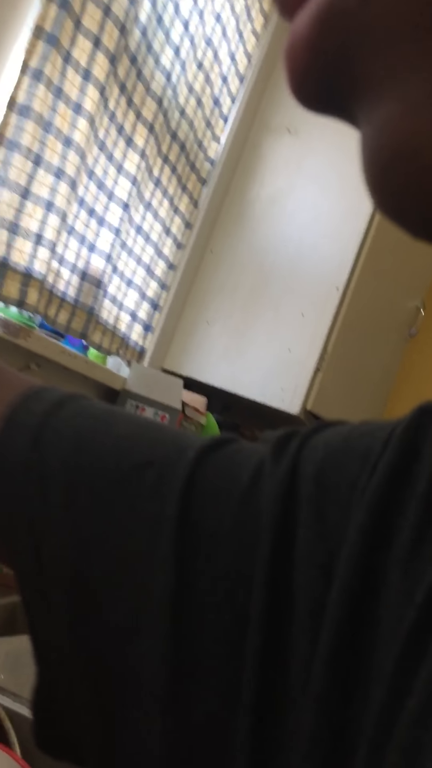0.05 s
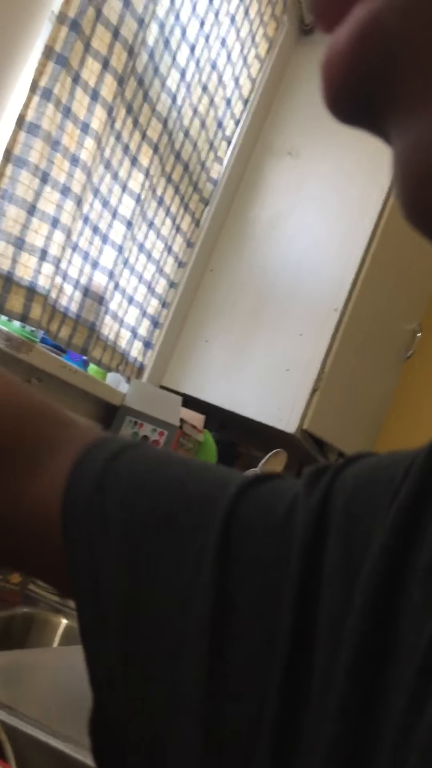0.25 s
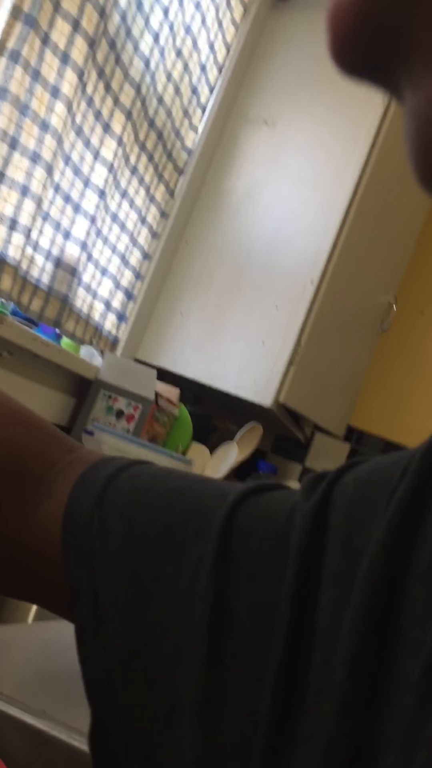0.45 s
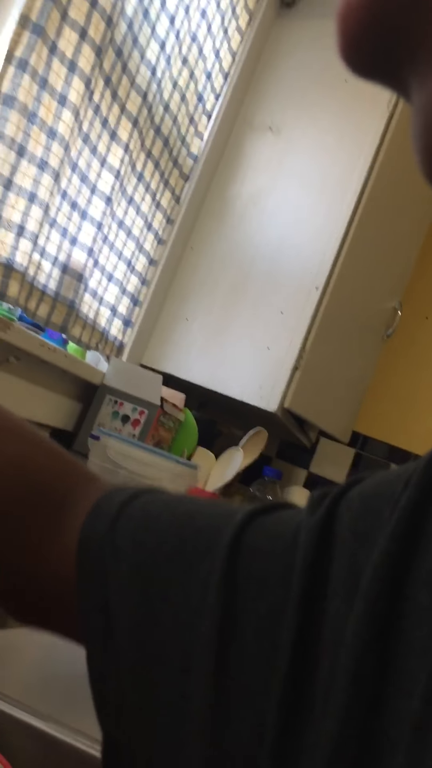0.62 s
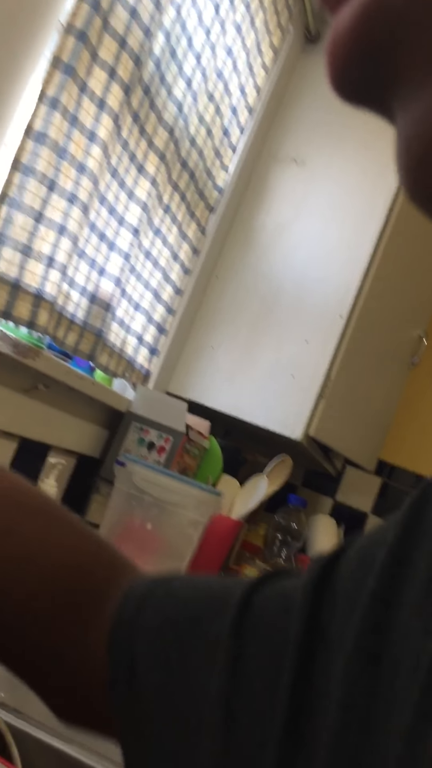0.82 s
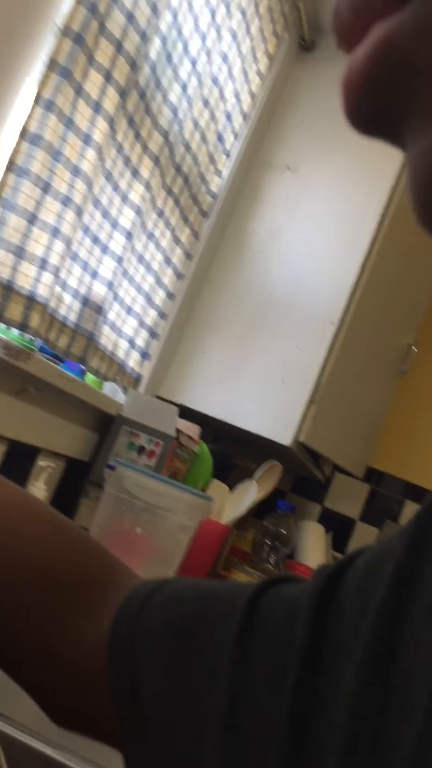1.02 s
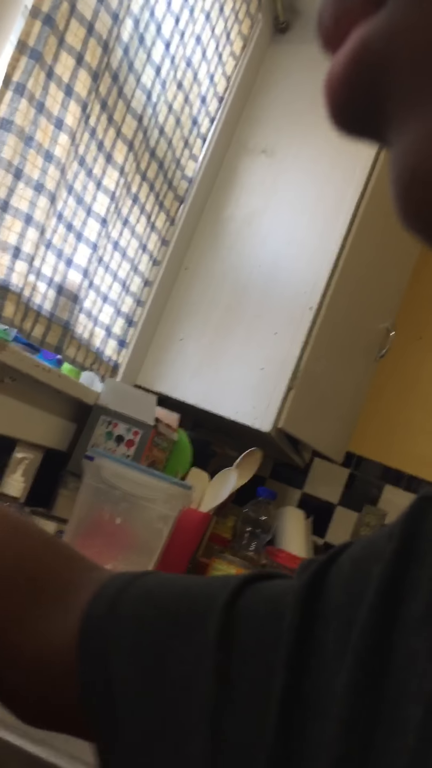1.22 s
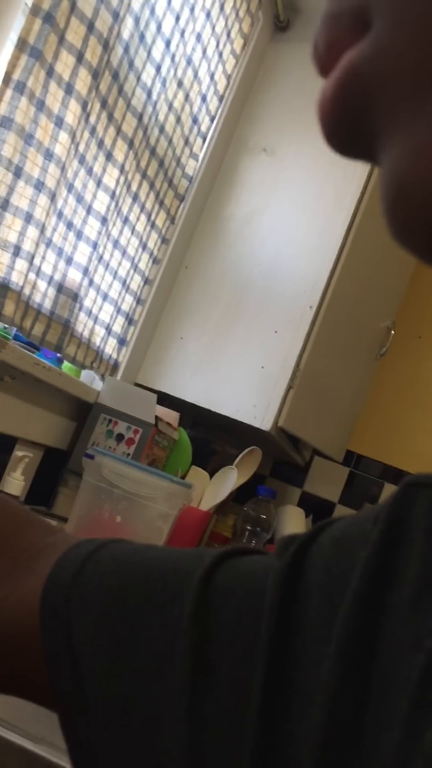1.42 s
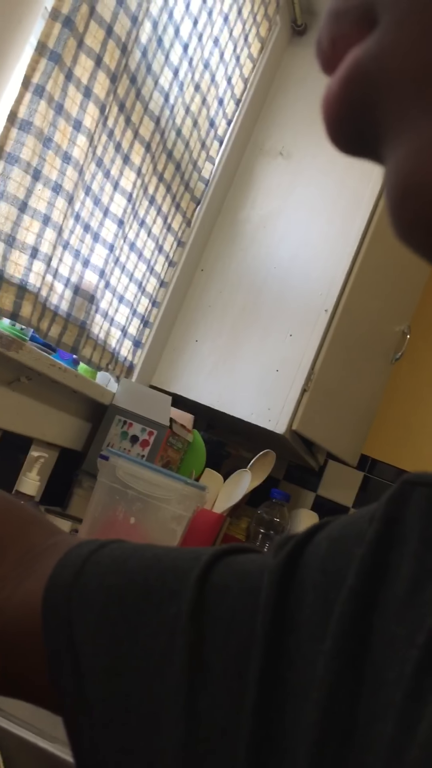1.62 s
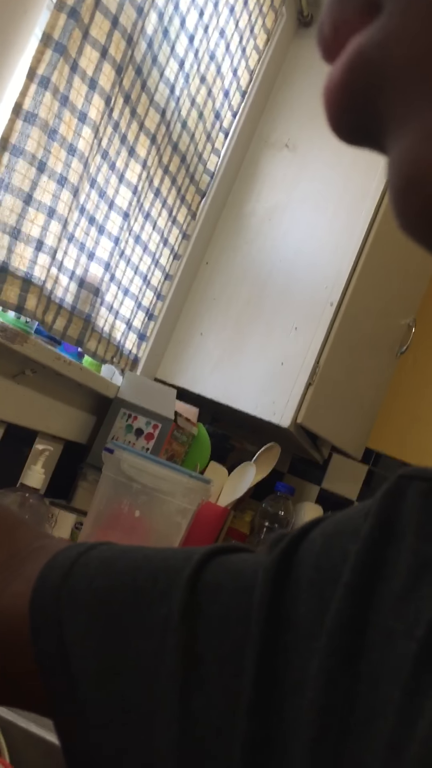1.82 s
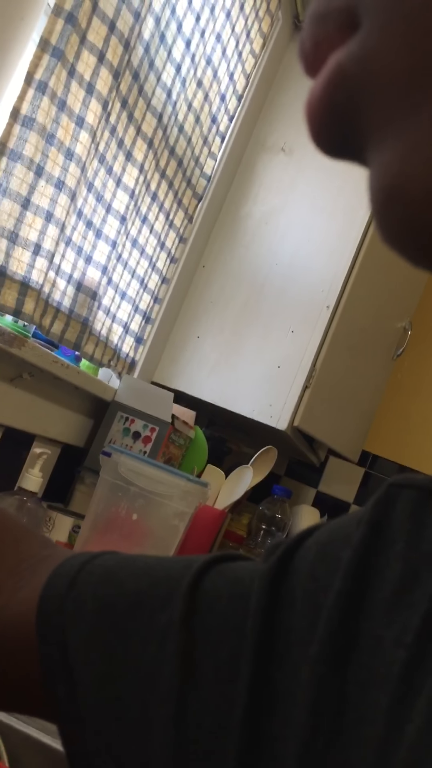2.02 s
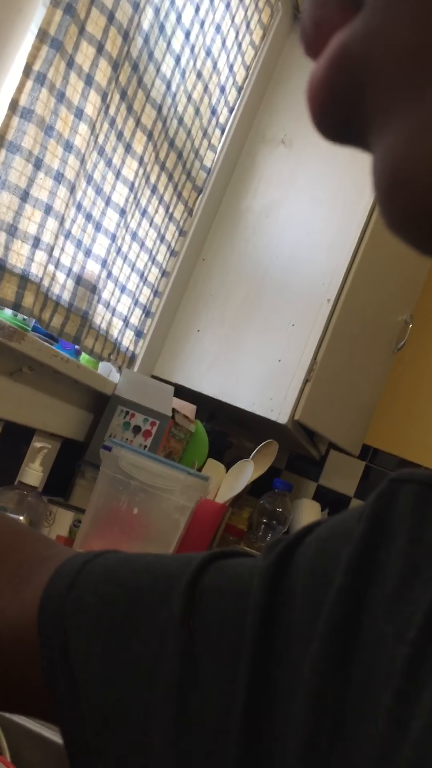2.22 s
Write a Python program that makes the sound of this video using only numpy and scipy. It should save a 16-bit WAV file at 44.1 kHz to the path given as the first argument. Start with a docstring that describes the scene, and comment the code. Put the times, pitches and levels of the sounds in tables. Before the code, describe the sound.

Cutlery clatter in a kitchen sink: one bright crash, a quieter gap, then scattered clanks

```python
"""Small kitchen, steel sink, washing up. Cutlery crashes onto a dish and rattles: modes over fading noise.
Things are knocked (damped noise and thin rings), clinked and scraped (grainy resonant noise).
Some blows boom the basin (decaying hum), the sink unit thumps, and water gulps (clusters of bubbles).
Hard walls answer with a diffuse tail, over room tone, uneven rumble and a late hiss of water."""
import sys
import numpy as np
from scipy import signal
from scipy.fft import rfft, irfft, next_fast_len
from scipy.io import wavfile
from scipy.ndimage import map_coordinates

SR = 44100
rng = np.random.default_rng(int(sys.argv[2]) if len(sys.argv) > 2 else 0)


def store_pcm(level_fs):
    """Save levels as 16-bit WAV."""
    pcm = np.round(np.clip(level_fs, -1, 1) * 32767).astype(np.int16)
    wavfile.write(sys.argv[1], SR, np.atleast_2d(pcm).T)


N = 101430
METAL_BLUR = .0015  # line width over pitch, as the pieces jostle


def amp(db):
    """Decibels to gain."""
    return 10 ** (np.asarray(db) / 20)


def unit(x):
    """Scaled to rms 1."""
    return x / np.sqrt(np.mean(x ** 2) + 1e-20)


def along(points, hz):
    """(Hz, value) points read on a log frequency axis."""
    point_hz, value = np.transpose(points)
    return np.interp(np.log(hz + 1), np.log(point_hz + 1), value)


def seconds(size=16384):
    """Time axis; the default size is that of one ring."""
    return np.arange(size) / SR


def curve(rows):
    """(s, value) points, one value per sample."""
    return np.interp(seconds(size=N), *np.transpose(rows))


def add(track, start_s, sound):
    """Mixes a sound into the track at start_s, cut at the track's end."""
    start = max(0, round(start_s * SR))
    track[start:start + len(sound)] += sound[:N - start]


def soft(hz, corner_hz):
    """Treble loss of a contact."""
    return 1 / np.sqrt(1 + (hz / corner_hz) ** 6)


def noise(gain, size=16384):
    """Noise whose spectrum follows gain(Hz)."""
    spectrum = rfft(rng.standard_normal(size))
    return irfft(spectrum * gain(np.fft.rfftfreq(size, 1 / SR)), size)


def dying(x, t60):
    """Each frequency of x fades at its own speed."""
    hz, t, bins = signal.stft(x, SR, nperseg=256)
    faded = bins * amp(-60 * t / along(t60, hz)[:, None])
    return signal.istft(faded, SR, nperseg=256)[1][:len(x)]


def ring(hz, gain, t60_s, blur=0):
    """Sum of decaying modes; blur lets each wander in phase."""
    t = seconds()[:, None]
    phase = hz * t + rng.random(len(hz))
    if blur:
        step = np.sqrt(blur * hz / (2 * np.pi * SR))
        phase = phase + np.cumsum(rng.standard_normal(phase.shape), 0) * step
    modes = gain * amp(-60 * t / t60_s) * np.sin(2 * np.pi * phase)
    return modes.sum(1)


def onset(rise_s):
    """Swell of a contact."""
    return 1 - np.exp(-seconds() / max(rise_s, 1e-4))


def crack(db, t60_s=0.011):
    """Extra gain in the first instant of a hard contact."""
    return 1 + amp(db - 60 * seconds() / t60_s)


def rattle(hits_per_s=260, t60_s=.016, hit_db=1):
    """Gain of many tiny rebounds at random moments, each decaying, over a steady 1."""
    hits = rng.random(len(seconds())) < hits_per_s / SR
    rebounds = signal.lfilter([1], [1, -amp(-60 / (t60_s * SR))], hits)
    return unit(1 + amp(hit_db) * rebounds)


def ripple(hz, depth_db=6.5, spacing_hz=90, from_hz=1000):
    """Narrow resonances of a piece of metal, as gain; they fade out toward the bass."""
    peaks = map_coordinates(rng.standard_normal(len(hz)), [hz / spacing_hz])
    depth = 1 - soft(hz, from_hz)
    return unit(amp(depth_db * np.clip(peaks, -2, 2))) ** depth


def crash(rise_s=0.0004):
    """Each landing rings dish and cutlery modes over a clash of resonant, fading noise."""
    # cutlery landings: start_s, dish_db, cutlery_db, clash_db, crack_db (re clash), bright_hz
    landings = [(0.2389, -25.5, -21, -14, 3, 3015), (0.242, -18.5, -28.5, -20.5, -1.5, 3294),
                (0.2497, -23.5, -29.5, -17, -4.5, 3966), (0.2639, -25.5, -32, -22, -5.5, 11000),
                (0.2713, -26, -28, -25, -3.5, 8990), (.289, -36, -37.5, -29, 0, 6000),
                (0.3355, -44.5, -32, -31, 24.5, 8950)]
    # modes of dish and basin together: pitch_hz, level_db
    dish_modes = [(244, 1), (324, -2), (408, -6), (478, -5.5), (521, -4.5), (660, -5.5), (703, -10.5),
                  (970, -3), (1000, -0.5), (1031, -1), (1178, -11), (1352, -9)]
    # modes of the cutlery: pitch_hz, level_db
    cutlery_modes = [(1744, -3), (1876, -2.5), (2597, -4), (2866, -3.5), (3559, -7), (4054, -13),
                     (7160, -6.5), (8440, -11.5)]
    # decay of the dish: freq_hz, t60_s
    dish_t60 = [(240, .27), (660, .33), (1000, .26), (1400, .22)]
    # decay of the cutlery: freq_hz, t60_s
    cutlery_t60 = [(1600, .26), (4000, .24), (9000, .18)]
    # clash spectrum: freq_hz, level_db
    clash_colour = [(30, -37), (80, -23), (170, -11), (260, -4), (480, 2), (700, 5.5), (830, -11),
                    (1200, -8.5), (1900, -2), (3000, -9), (4300, -1), (5000, -13), (6800, -8.5),
                    (10000, -18.5), (15000, -27)]
    # decay of the clash: freq_hz, t60_s
    clash_t60 = [(80, 0.41), (400, 0.29), (2000, 0.26), (5000, 0.17), (13000, 0.25)]
    out = np.zeros(N)
    dish_hz, dish_mode_db = np.transpose(dish_modes)
    steel_hz, steel_mode_db = np.transpose(cutlery_modes)
    for start_s, dish_db, steel_db, clash_db, crack_db, bright_hz in landings:
        body = ring(dish_hz, amp(dish_db + dish_mode_db), along(dish_t60, dish_hz), METAL_BLUR)
        steel_gain = amp(steel_db + steel_mode_db) * soft(steel_hz, bright_hz)
        tines = ring(steel_hz, steel_gain, along(cutlery_t60, steel_hz), METAL_BLUR)

        def clash_gain(hz):
            treble_lift = np.hypot(1, hz * bright_hz / 5500 ** 2)
            return ripple(2 * hz) * amp(along(clash_colour, hz)) * soft(hz, bright_hz) * treble_lift

        burst = dying(unit(noise(clash_gain)), clash_t60)
        clash = amp(clash_db) * crack(crack_db) * rattle() * burst
        add(out, start_s, onset(rise_s) * (body + tines + clash))
    return out


def knocks(lowest_hz=800, highest_hz=13000, count=24):
    """Hand-damped contacts, dull or sharp; each piece leaves its own thin steel ring."""
    # contacts in the sink: start_s, clack_db, body_db and tick_db (re clack), rise_s
    contacts = [(0, -32.5, -1, -22, 0.0041), (0.21, -50.5, 15.5, 16.5, 0.011),
                (0.419, -30, -10, -8.5, 0.0015), (.443, -24, -7, -19.5, 0.0016),
                (.479, -28, -9.5, -23.5, 0.00067), (0.99, -53, 8, -13.5, 0.0016),
                (1.139, -32, -6.5, -13.5, 0.0028), (1.158, -31, -2.5, -13, 0.0017),
                (1.177, -40, -10, -13, 0.0021), (1.252, -40.5, 8.5, -15, 0.0028),
                (1.265, -29.5, -12.5, -16.5, 0.00063), (1.302, -26.5, -2, -21, 0.00058),
                (1.399, -48.5, 4, -22, 0.0022), (1.447, -33, -0.5, -26, 0.0013),
                (1.5011, -53, -3, -35, 0.00061), (1.585, -33, -10, -26.5, 0.003),
                (1.618, -43.5, 8, -23, .002), (1.629, -35, -5, -18, 0.00076),
                (1.643, -35, -7.5, -30, 0.0022), (1.672, -42.5, -9, -32, 0.001),
                (1.699, -56, 3.5, -27, 0.0013), (1.7432, -41.5, 1.5, -24.5, 0.006),
                (1.865, -37, -1, -20, 0.0053), (1.876, -37, -1, -24.5, 0.0015),
                (1.941, -26.5, 0, -13, 0.0055), (1.964, -19, -10, -32, 0.00026),
                (1.988, -28.5, -7.5, -24, 0.0022), (2.027, -29, -7, -6.5, 0.0024),
                (2.138, -50, 5, -6, 0.00184), (2.21, -37, 2, -39, 0.012)]
    # anchors of body, clack and tick: freq_hz
    bands_hz = [480, 2400, 11000]
    # spectrum common to the knocks: freq_hz, level_db
    knock_colour = [(25, -12.5), (65, 11), (190, 7.5), (330, 11.5), (480, 15.5), (680, 14.5), (1000, 6),
                    (1700, 2.5), (3300, 0), (4300, 0.5), (5000, 0.5), (9500, -2.5), (15000, -6)]
    # decay of the knock noise: freq_hz, t60_s
    knock_t60 = [(80, 0.37), (400, 0.14), (2000, 0.096), (6000, 0.098), (13000, 0.1)]
    crack_db, steel_db, steel_t60_s = 7.5, -15, .17
    out = np.zeros(N)
    for start_s, clack_db, body_db, tick_db, rise_s in contacts:
        tone = list(zip(bands_hz, (body_db, 0, tick_db)))

        def colour(hz):
            return amp(along(knock_colour, hz) + along(tone, hz))

        burst = dying(noise(lambda hz: colour(hz) * ripple(hz)), knock_t60)
        # random pitches, denser toward the low end
        place = (np.arange(count) + rng.random(count)) / count
        steel_hz = lowest_hz + (highest_hz - lowest_hz) * place ** 2
        steel_gain = amp(steel_db) * colour(steel_hz) / np.sqrt(count)
        tines = ring(steel_hz, steel_gain, steel_t60_s, METAL_BLUR)
        contact = crack(crack_db) * rattle() * burst
        add(out, start_s, amp(clack_db) * onset(rise_s) * (contact + tines))
    return out


def clinks(t60_s=.17, blur=.008):
    """Short, rough rings of single pieces of cutlery, a few blurred modes each."""
    # pieces left ringing: start_s, level_db, pitch_hz
    pieces = [(1.158, -47, 3000), (1.45, -46, 2650), (1.5005, -55, 3750), (1.63, -51, 3500),
              (1.866, -47, 1700)]
    # modes of a piece: ratio to pitch_hz
    ratios = [.85, 1, 1.09]
    out = np.zeros(N)
    for start_s, level_db, pitch_hz in pieces:
        gain = amp(level_db) / np.sqrt(len(ratios))
        add(out, start_s, ring(pitch_hz * np.array(ratios), gain, t60_s, blur))
    return out


def booms(rise_s=0.00096):
    """The sheet floor of the basin hums on; each heavier blow feeds the same vibration."""
    # blows on the basin floor: start_s, level_db
    blows = [(.992, -48.5), (1.144, -34.5), (1.179, -31), (1.255, -41), (1.302, -26), (1.49, -50),
             (1.752, -47), (1.876, -37.5), (1.943, -36), (1.971, -29.5), (2.039, -36), (2.229, -47)]
    # floor modes, the main hum drops fast, then lingers: pitch_hz, level_db (re blow), t60_s
    floor_modes = [(246, 0, .16), (246, -19, .33), (120, -15, .16), (325, -17, .2), (665, -13, .28)]
    out = np.zeros(N)
    for hz, mode_db, t60_s in floor_modes:
        swing = np.zeros(N)
        for start_s, blow_db in blows:
            decay = amp(blow_db + mode_db - 60 * seconds() / t60_s)
            add(swing, start_s, decay * onset(rise_s))
        out += swing * np.sin(2 * np.pi * (hz * seconds(size=N) + rng.random()))
    return out


def gulps(rise_s=.002):
    """Clusters of large bubbles, each rising in pitch as it dies."""
    # gulps of water: start_s, length_s, level_db
    clusters = [(0.051, 0.088, -55), (0.216, 0.022, -43.5), (0.429, 0.075, -37.5), (0.529, 0.043, -52),
                (.638, 0.0057, -41), (0.65, 0.079, -48), (0.705, 0.034, -42), (0.811, 0.011, -48),
                (0.834, 0.054, -53)]
    median_hz, log_spread, bubbles_per_s = 386, .28, 390
    cycles_to_60db, pitch_rise = 5.6, 0.18  # rise: fraction of pitch gained over the 60 dB decay
    out, t = np.zeros(N), seconds(size=8192)
    for start_s, length_s, level_db in clusters:
        draws = rng.standard_normal((40, 2))[:max(2, int(length_s * bubbles_per_s))]
        cluster = np.zeros(N)
        for k, (pitch, strength) in enumerate(draws):
            hz = median_hz * np.exp(log_spread * np.clip(pitch, -2, 2))
            age = np.minimum(t * hz / cycles_to_60db, 2)
            tone = np.sin(2 * np.pi * hz * t * (1 + pitch_rise * age / 2))
            bubble = tone * amp(-60 * age) * (1 - np.exp(-t / rise_s))
            add(cluster, start_s + length_s * k / len(draws), amp(2 * strength) * bubble)
        # level_db is the rms over the gulp plus a short tail
        out += amp(level_db) * unit(cluster) * np.sqrt((length_s + 0.0059) * SR / N)
    return out


def scrapes(grain_db=2.5, rustle_db=2, ring_db=6):
    """Metal slides on wet metal: grainy, uneven friction through many narrow resonances."""
    # slides: peak_s, half_length_s, level_db, bright_hz
    slides = [(0.246, 0.071, -51, 5340), (0.337, 0.061, -29.5, 4170), (0.576, 0.066, -52, 4160),
              (0.702, 0.11, -64, 4500), (0.859, 0.053, -56, 2980), (1.338, 0.056, -56.5, 6750),
              (1.461, 0.027, -56, 4080), (1.944, 0.099, -52.5, 3420)]
    # friction spectrum: freq_hz, level_db
    scrape_colour = [(200, -14.5), (700, -2), (1900, -1), (3000, -4), (4200, -0.5), (5000, -8.5),
                     (7000, -1.5), (15000, -20)]
    out, t = np.zeros(N), seconds(size=N)
    for peak_s, half_s, level_db, bright_hz in slides:
        peaks, slips, pushes = rng.standard_normal((3, 1000))

        def rub_gain(hz):
            resonance_db = ring_db * map_coordinates(peaks, [hz / 35])
            return soft(hz, bright_hz) * amp(along(scrape_colour, hz) + resonance_db)

        rub = noise(rub_gain, size=N)
        slip_db = grain_db * map_coordinates(slips, [t * 300])
        push_db = rustle_db * map_coordinates(pushes, [t * 70])
        swell = np.exp(-((t - peak_s) / half_s) ** 2)
        out += amp(level_db) * swell * unit(rub * amp(slip_db + push_db))
    return out


def thumps(rise_s=0.0043, centre_hz=75, t60_s=0.18):
    """Dull bumps ring low, loose modes of the sink unit, tuned a little differently each time."""
    # bumps against the sink unit: start_s, level_db
    bumps = [(.005, -43), (0.346, -33), (0.425, -42), (0.725, -39.5), (1.169, -33), (1.945, -31),
             (2.239, -43.5)]
    out = np.zeros(N)
    for start_s, level_db in bumps:
        hz = centre_hz * np.array([.78, 1, 1.3]) * np.exp(rng.normal(0, .08))
        thump = ring(hz, np.array([.5, 1, .5]), t60_s)
        add(out, start_s, amp(level_db) * onset(rise_s) * thump)
    return out


def kitchen(x, build_s=0.028, size=32768):
    """Diffuse answer of the walls: convolution with a noise tail that builds up, then fades."""
    # decay of the room: freq_hz, t60_s
    kitchen_t60 = [(100, 0.55), (2500, 0.41), (7000, 0.37), (14000, 0.49)]
    build = 1 - np.exp(-seconds(size=size) / build_s)
    tail = dying(rng.standard_normal(size), kitchen_t60) * build
    return signal.fftconvolve(x, tail / np.linalg.norm(tail))[:N]


def background(room_tone_db=-66.5, rumble_offset_db=-5):
    """Shaped noises: steady room tone, a low rumble that comes and goes, a late hiss of water."""
    # room tone spectrum: freq_hz, level_db
    room_colour = [(25, -1.5), (150, -2), (600, -4.5), (1300, -9.5), (9000, -18), (16000, -26.5)]
    # rumble level before the offset: time_s, level_db
    rumble_level = [(0, -54.5), (.2, -49.5), (.5, -42.5), (.62, -62), (1.0, -53), (1.09, -77),
                    (1.28, -51.5), (1.55, -48.5), (1.72, -50.5), (2.05, -66), (2.15, -71.5)]
    # rumble spectrum: freq_hz, level_db
    rumble_colour = [(20, -17.5), (45, -7.5), (70, 2), (120, -8), (250, -10.5), (1000, -63)]
    # faint hiss of water: time_s, level_db
    fizz_level = [(1.98, -100), (2.06, -65.5), (2.24, -61.5), (2.29, -71.5)]
    # hiss spectrum: freq_hz, level_db
    fizz_colour = [(500, -24), (3000, -0.5), (7000, 2.5), (10000, -0.5), (15000, 1.5)]

    def bed(colour):
        return unit(noise(lambda hz: amp(along(colour, hz)), size=N))

    room_tone = amp(room_tone_db) * bed(room_colour)
    rumble = amp(rumble_offset_db + curve(rumble_level)) * bed(rumble_colour)
    fizz = amp(curve(fizz_level)) * bed(fizz_colour)
    return room_tone + rumble + fizz


def scene(kitchen_db=-15):
    """Everything in the sink, with the room around it."""
    sink = crash() + knocks() + clinks() + booms() + gulps() + scrapes()
    return (sink + amp(kitchen_db) * kitchen(sink) + thumps() + background())[None]


def record(dry, ceiling=.8, bass_cut_hz=48, top_hz=16200):
    """The recorder rounds off the highest peaks, drops the deepest bass and all above top_hz."""
    rounded = dry / (1 + np.abs(dry / ceiling) ** 6) ** (1 / 6)
    bass_cut = signal.butter(3, bass_cut_hz, "highpass", fs=SR, output="sos")
    thinned = signal.sosfilt(bass_cut, rounded)
    size = next_fast_len(N + 8192)
    kept = np.fft.rfftfreq(size, 1 / SR) < top_hz
    return irfft(rfft(thinned, size) * kept, size)[:, :N]


dry = scene()
out = record(dry)
store_pcm(out)
```